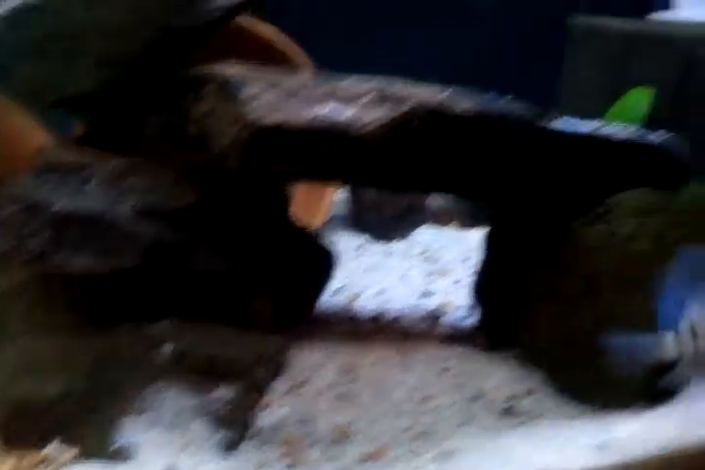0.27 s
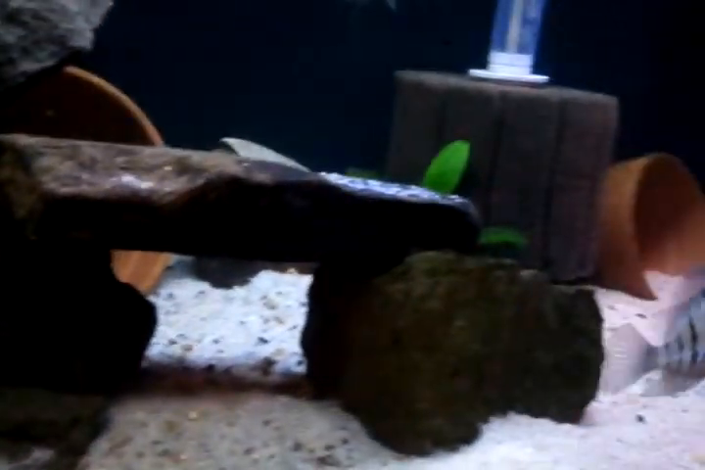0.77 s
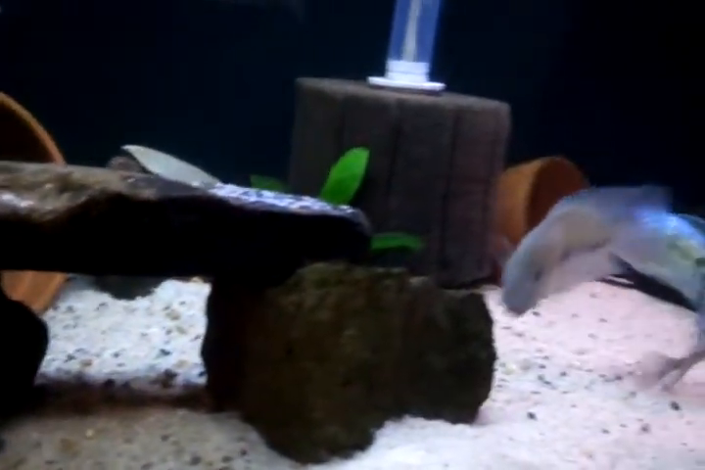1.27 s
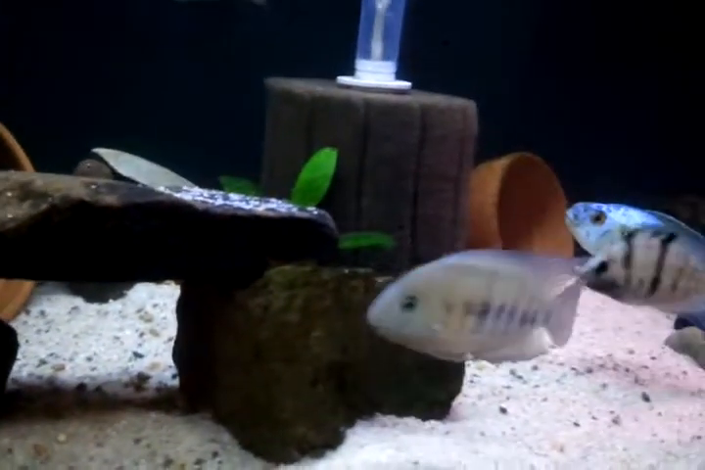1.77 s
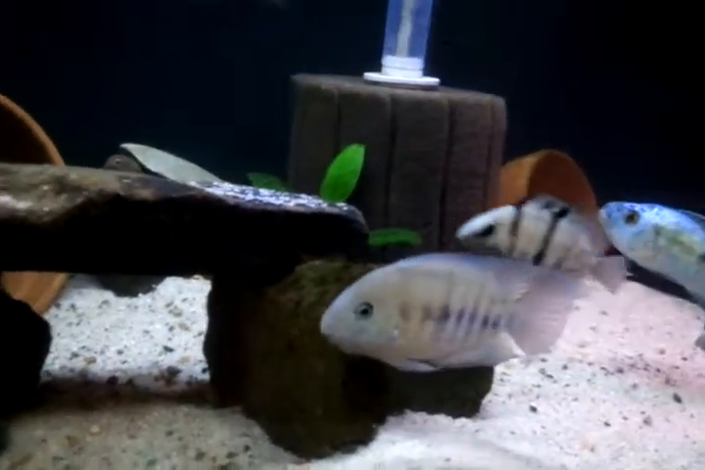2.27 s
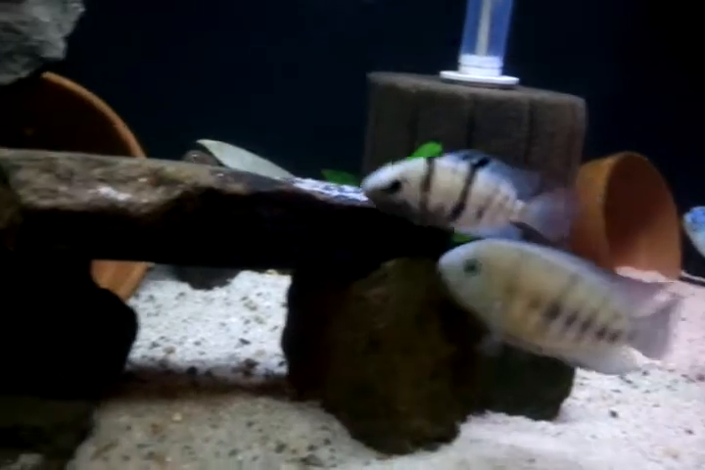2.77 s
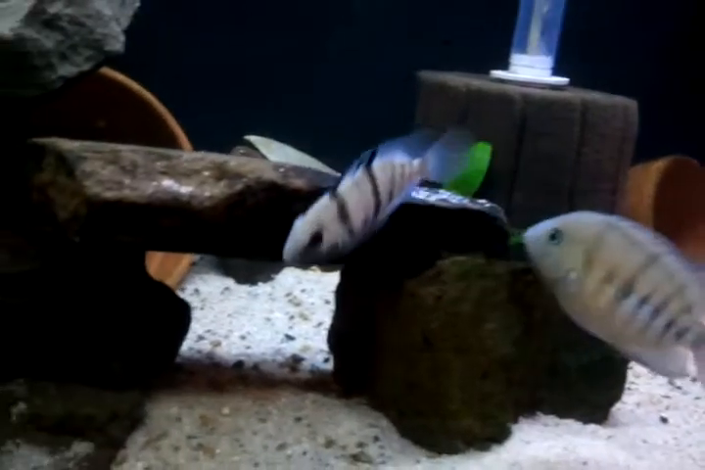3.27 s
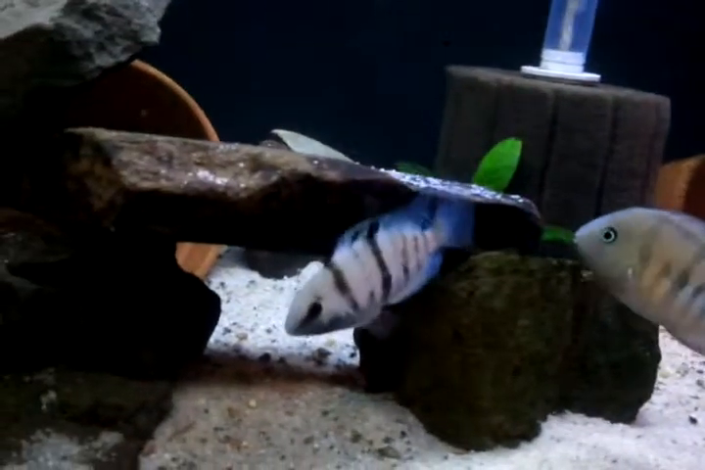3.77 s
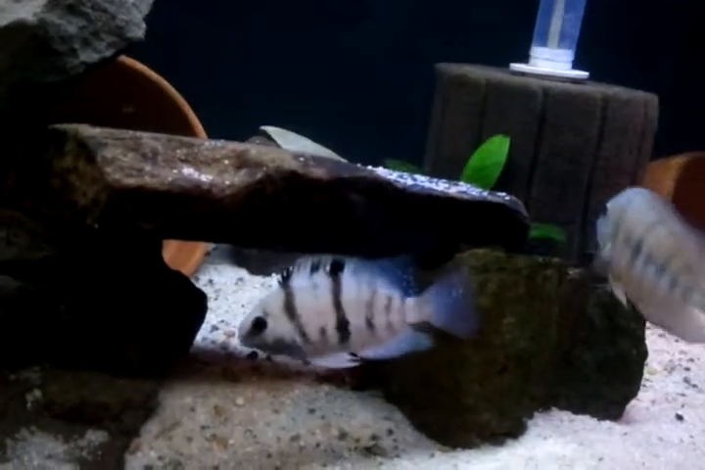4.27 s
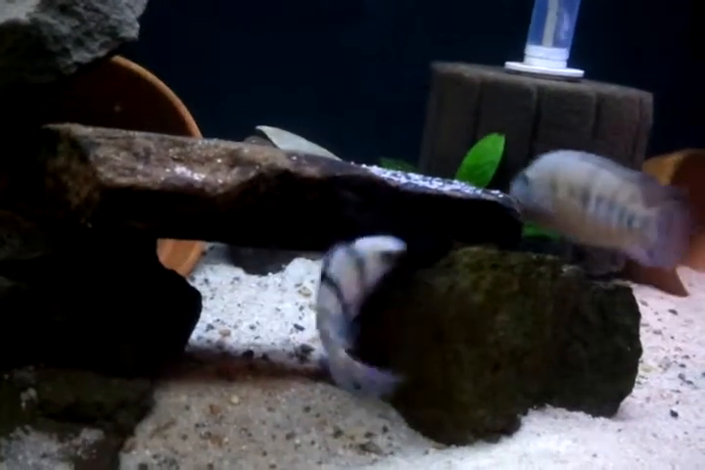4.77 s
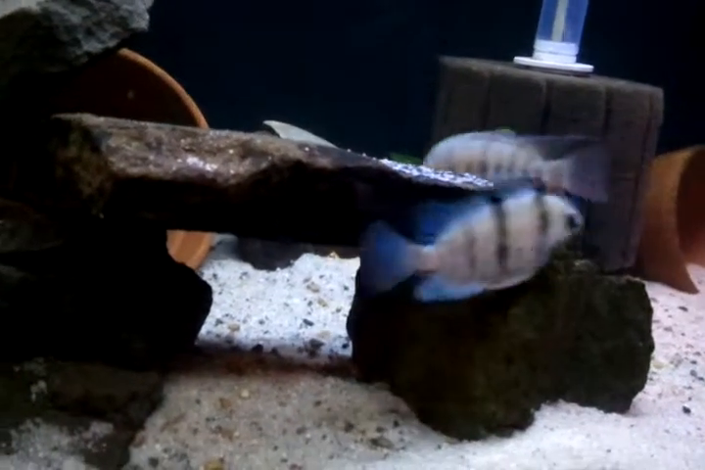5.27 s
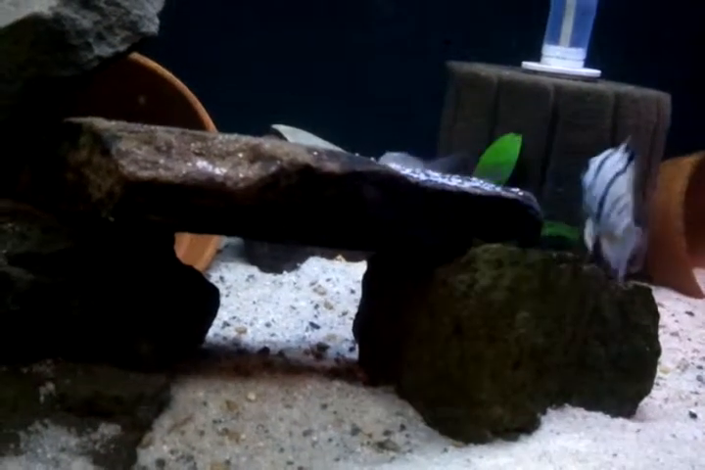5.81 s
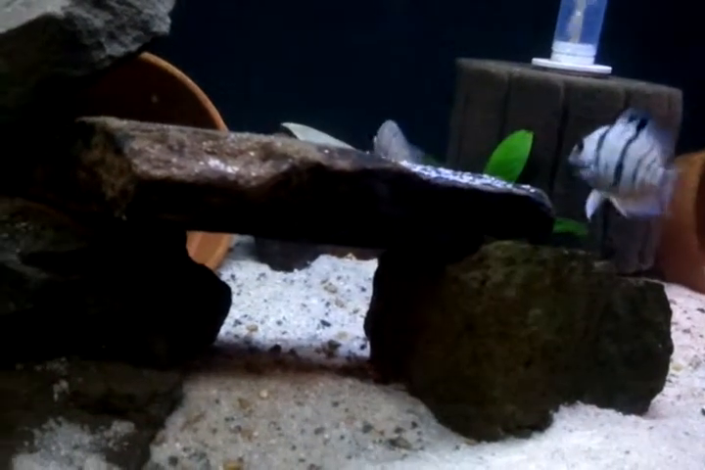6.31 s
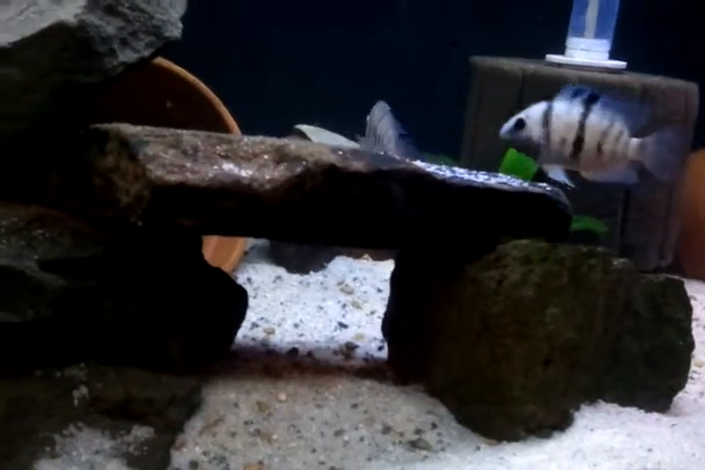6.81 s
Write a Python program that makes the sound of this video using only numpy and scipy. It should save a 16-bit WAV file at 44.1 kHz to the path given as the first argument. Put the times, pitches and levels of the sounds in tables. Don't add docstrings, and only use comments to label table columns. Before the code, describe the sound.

Close, single-microphone sound beside an indoor aquarium. Throughout, filter water falls into the tank with a soft mid-range wash and a brighter fizz of tiny bubbles, over low mains-like pump hum, motor noise and a thin steady whine near 1.4 kHz. From 0.3 seconds the moving camera brings grip knocks and fluttering air on the microphone: strong blows at about 0.5 and 0.65, a thud at 0.9, and the heaviest low buffet at 1.1, fading by 1.4. Small bumps follow at 1.9, 2.1 and 2.6, with low rising gulps between 1.9 and 2.6. Clear bubbles plip and ring between the glass walls, with denser small bursts around 3.3 to 4.4. Sharp droplets snap at 3.1, loudest at 3.6, and fainter at 5.5 and 6.8. The level eases slightly after 5 seconds, dipping near 6.2, while water and hum continue to the end at seven seconds.

```python
import sys
import numpy as np
from scipy import signal
from scipy.fft import rfft, irfft, next_fast_len
from scipy.io import wavfile
from scipy.ndimage import uniform_filter1d, map_coordinates

SR = 44100
rng = np.random.default_rng(int(sys.argv[2]) if len(sys.argv) > 2 else 0)


def store_wav(level_fs):
    pcm = np.round(np.clip(np.atleast_2d(level_fs), -1, 1) * 32767)
    wavfile.write(sys.argv[1], SR, pcm.T.astype(np.int16))


def natural_amplitude(level_db):
    exponent = np.asarray(level_db, float) / 20
    return 10 ** exponent


N = 310905

# frequency in Hz, density in dB per Hz.
RUMBLE_SPECTRUM = [(3, -30), (13, -5), (20, -7), (29, 0), (40, -7), (60, -8), (85, -10), (110, -16),
                   (160, -24), (350, -60)]
# start in seconds, rise in seconds, hold in seconds, level in dB.
SWAYS = [
    (.57, 0.38, 0.026, -30.5),
    (1.09, 0.055, 0.11, -21.5),
    (1.3, 0.075, 0.033, -34.5),
    (2.6, 0.26, 0.021, -35.5),
    (2.84, .15, 0.032, -43),
    (3.9, 0.14, 0.028, -37),
    (4.42, 0.25, 0.023, -38.5),
    (4.96, 0.15, 0.027, -38.5),
]

MAINS_HZ = 60.005
# mains order, rms level in dB.
HUM_LINES = [(1, -42), (2, -43), (3, -45), (4, -47), (6, -49), (8, -63), (9, -53.5), (10, -55), (11, -63),
             (14, -61), (17, -61)]
# mains order, rms level in dB, phase swing in radians,
# level swing once a cycle and twice a cycle as shares.
MAGNETIC_WHINE = (23, -40.6, .55, .06, .2)
# frequency in Hz, width in Hz, level in dB.
CASING_MODES = [(216.8, 42.6, -1.5), (285.6, 72.5, -2), (330.6, 52.4, 0.5), (569, 39, -2), (753, 110, -8),
                (1114, 190, -8), (1500, 200, -9.5)]

# start in seconds, level in dB, decay by 60 dB in seconds.
GRIP_KNOCKS = [
    (.33, -36, .1),
    (.47, -27, .16),
    (.655, -36, .3),
    (1.105, -25, .13),
    (1.906, -33, .11),
    (2.076, -35, .19),
    (2.57, -32, .055),
]
# frequency in Hz, density in dB per Hz.
SHELL_SPECTRUM = [(80, -18), (200, 1), (500, -0.5), (1200, 0), (2000, -29), (5000, -30.5), (8000, -58.5)]

RISE_DB = 23.5
FLUTTER_SAG_HZ_PER_S = 220
# start in seconds, rise in seconds, hold in seconds, level in dB,
# flutter in Hz.
GUSTS = [
    (.325, .02, .03, -26, 140),
    (.6, .02, .025, -21, 180),
    (.765, .01, .035, -25, 190),
    (.83, .03, .06, -33, 140),
    (1.18, .02, .045, -18, 135),
    (1.255, .01, .008, -26, 110),
    (.469, .004, .092, -13, 210),
    (.662, .04, .084, -12, 200),
    (1.106, .003, .05, -10.5, 132),
]
# start in seconds, rise in seconds, hold in seconds, level in dB.
RASPS = [
    (.325, .02, .015, -37),
    (.478, .01, .04, -21),
    (.57, .03, .02, -33),
    (.645, .03, .03, -32),
    (.79, .1, .17, -39),
    (1.107, .005, .04, -36),
]
# start in seconds, rise in seconds, hold in seconds, level in dB.
THUDS = [
    (.33, .04, .02, -28),
    (.48, .03, .03, -25),
    (.53, .03, .05, -24),
    (.6, .03, .04, -27),
    (.72, .08, .05, -32),
    (1.3, .05, .02, -30),
    (.93, .012, .05, -20),
    (1, .02, .03, -27),
    (1.085, .03, .11, -19),
    (1.72, .03, .06, -30.5),
]
# start in seconds, rise in seconds, hold in seconds, level in dB.
HOOTS = [
    (.345, .02, .03, -35),
    (.485, .015, .09, -23),
    (.665, .03, .01, -25),
    (.725, .03, .02, -23),
    (.87, .08, .2, -36),
    (1.125, .02, .02, -26),
    (1.19, .02, .03, -32),
]

# time in seconds, level in dB.
FLOW = [(0, -42), (.25, -41), (.5, -41.5), (.92, -40.5), (1.13, -44), (1.5, -40.5), (1.85, -40),
        (2.02, -41), (2.25, -40), (2.9, -41.5), (3.33, -40), (4.02, -41), (4.2, -39.5), (4.6, -41.5),
        (5.1, -40), (5.5, -41.5), (6.7, -41.5), (6.9, -39)]
# frequency in Hz, density in dB per Hz.
WASH_SPECTRUM = [(76, -32), (130, -4.5), (290, -4), (346, -7.5), (433, -8), (571, -7.5), (663, -8),
                 (1200, -14), (1410, -7.5), (1570, -11), (2600, -17.5), (3380, -52.5), (5720, -120)]
# frequency in Hz, density in dB per Hz.
FIZZ_SPECTRUM = [(1290, -16), (2200, -6.5), (2360, -5), (2800, -0.5), (3050, 1), (3690, 0), (4020, 0),
                 (6350, -7.5), (6670, -9.5), (7150, -19.5), (9300, -49), (15700, -120)]
# frequency in Hz, width in Hz, boost in dB.
LID_MODES = [(3170, 170, 2), (3700, 110, 4), (2150, 49, 3.5), (1736, 310, 4.5)]

# start in seconds, frequency in Hz, peak in dB.
DROPLETS = [
    (3.09, 6080, -19.5),
    (3.576, 4650, -15.5),
    (3.576, 6480, -34.5),
    (1.103, 3400, -26.5),
    (1.104, 1330, -22),
    (5.52, 6080, -26.5),
    (6.839, 5540, -28),
]

# start in seconds, pitch in Hz, peak in dB, pitch rise as a share, life in seconds.
GULPS = [
    (1.908, 195, -27, .95, .05),
    (2.084, 140, -22, 1.1, .05),
    (2.222, 200, -30, .9, .04),
    (2.56, 110, -28, .3, .08),
]
# start in seconds, pitch in Hz, peak in dB, echoing time in seconds.
LARGE_BUBBLES = [(.349, 1140, -35.5, 0.022), (1.414, 1290, -25.5, .03), (1.44, 1290, -25, .012),
                 (1.508, 1350, -30.5, 0.027), (1.548, 1460, -30, .012), (1.912, 1143, -33, 0.013),
                 (2.074, 835, -34, 0.0096), (2.204, 1117, -25.5, 0.027), (2.659, 1268, -25, .042),
                 (2.88, 790, -29, 0.025), (2.988, 1310, -28.5, 0.012), (3.4, 1310, -26.5, .003),
                 (3.613, 855, -34, 0.011), (3.752, 777, -35.5, 0.016), (4.179, 1038, -30.5, 0.014),
                 (5.182, 1120, -30, 0.016), (5.475, 1153, -26, .003), (5.615, 1070, -34, .013),
                 (5.792, 1065, -26.5, .019), (6.222, 1036, -31, 0.021), (6.642, 1154, -37, .018),
                 (6.771, 1166, -33.5, .02), (6.867, 1120, -35.5, .015)]
# start in seconds, pitch in Hz, peak in dB, echoing time in seconds.
MIDDLE_BUBBLES = [(0.326, 1540, -31, .013), (0.926, 1745, -30.5, 0.044), (1.303, 1460, -32.5, .025),
                  (1.394, 1705, -30.5, 0.03), (1.452, 1560, -29, .004), (1.581, 2125, -26, 0.0064),
                  (2.267, 1500, -33.5, .009), (2.328, 1950, -33, .007), (2.433, 2000, -35, .031),
                  (2.731, 2150, -23.5, .003), (2.937, 2150, -35, .014), (3.071, 2166, -26, 0.0066),
                  (3.281, 2150, -33, 0.018), (3.595, 1520, -33, 0.015), (3.888, 1750, -30.5, .013),
                  (3.893, 2150, -36, 0.0098), (4.117, 1680, -26.5, 0.0066), (4.153, 1670, -31, .008),
                  (5.222, 1776, -32.5, .011), (5.393, 1660, -34.5, 0.015), (5.651, 1580, -30, 0.016),
                  (5.966, 1695, -28.5, .024), (6.779, 1854, -32, 0.032), (6.939, 2460, -31.5, .008),
                  (.221, 1700, -38, 0.016), (.916, 2280, -38.5, 0.0099), (3.72, 1910, -37.5, 0.018),
                  (4.46, 2100, -34.5, .02), (6.352, 2170, -33, .01)]
# start in seconds, pitch in Hz, peak in dB, echoing time in seconds.
SMALL_BURSTS = [(.195, 3430, -28, 0.054), (.749, 5030, -35, .013), (.92, 3460, -28, 0.029),
                (1.738, 3370, -28.5, .008), (1.737, 3000, -32.5, 0.025), (1.905, 3840, -25, 0.0079),
                (2.154, 2960, -28.5, 0.02), (2.207, 4260, -27, .02), (3.086, 5850, -28.5, .011),
                (3.333, 3530, -29.5, 0.021), (3.379, 3100, -26, 0.0081), (3.577, 4400, -27, .009),
                (3.635, 3830, -29, .054), (3.871, 3550, -28, 0.011), (4.111, 2900, -25.5, .015),
                (4.153, 3120, -28, 0.02), (4.152, 5850, -32.5, .011), (4.196, 3580, -25.5, .045),
                (4.291, 3165, -30, 0.0077), (4.359, 2920, -31, 0.012), (4.712, 3084, -29.5, 0.036),
                (4.862, 3860, -28.5, 0.013), (5, 4830, -32, .018), (5.153, 3640, -26.5, 0.0077),
                (5.734, 4970, -33.5, 0.019), (6.572, 5060, -37, 0.036), (6.836, 4540, -29.5, 0.013),
                (6.936, 3660, -27, 0.0087), (6.955, 3060, -30, 0.0091), (6.996, 2884, -35, 0.013)]
# start in seconds, pitch in Hz, peak in dB, echoing time in seconds.
FINE_SPRAY = [(.806, 4580, -40, 0.016), (1.87, 5080, -34, 0.018), (1.941, 3860, -34, .01),
              (2.228, 4570, -38, .022), (3.575, 5480, -33.5, .01), (3.689, 5210, -34, .02),
              (3.819, 3320, -31.5, .019), (4.06, 2400, -38, .018), (4.13, 2946, -32, .03),
              (4.225, 3440, -31, 0.028), (6.84, 3700, -34, 0.018), (4.39, 3220, -32.5, .015),
              (4.711, 5220, -32, .007), (5.873, 5830, -35, 0.024), (6.661, 5450, -38, .029),
              (6.834, 5950, -35.5, .012), (6.867, 5460, -35.5, 0.0088)]
# start in seconds, pitch in Hz, peak in dB, echoing time in seconds.
SINGLE_PLIPS = [(.821, 733, -38, .005), (1.072, 713, -33.5, .005), (1.737, 1155, -33.5, .006),
                (4.621, 943, -36, .006), (5.599, 1100, -34, .005), (.203, 1870, -35.5, .006),
                (.741, 2150, -30, .005), (1.349, 1755, -35, .006), (1.521, 1680, -30, .008),
                (2.109, 1610, -33.5, .006), (2.937, 1610, -35.5, .005), (3.307, 1960, -32, .005),
                (3.578, 1560, -31, .005), (4.526, 1690, -33, .005), (4.872, 1670, -35, .006),
                (4.945, 1560, -32.5, .006), (5.84, 1690, -33.5, .008), (.097, 3200, -35, .006),
                (2.2, 2990, -29, .006), (2.33, 3130, -31, .006), (2.5, 3220, -30.5, .01),
                (2.616, 3340, -32.5, 0.0055), (2.656, 3300, -31.5, .02), (4.585, 3510, -31, .006),
                (5.322, 3230, -33, .006), (5.524, 3380, -31, .008), (6.055, 3320, -36, .006),
                (6.084, 3580, -35.5, .006), (6.54, 3280, -32.5, .006), (6.706, 3110, -33, .006),
                (6.12, 3050, -34, .02), (6.56, 3050, -33, .02), (6.33, 3000, -35, .01),
                (4.21, 3200, -30, .03)]

# time in seconds, gain in dB.
RECORDER_GAIN = [(0, -1.8), (.27, -1.8), (.4, -.9), (.87, 0), (4.85, 0), (5.4, -1.7), (5.8, -2),
                 (6.2, -3.2), (6.55, -2.1), (7.05, -1.8)]


def unit(x):
    return x / np.sqrt(np.mean(x ** 2) + 1e-20)


def along(points, hz):
    f, v = np.transpose(points)
    return np.interp(np.log(hz + 1), np.log(f + 1), v)


def curve(rows):
    s, value = np.transpose(rows)
    return np.interp(np.arange(N) / SR, s, value)


def wobble(rate):
    knots = rng.standard_normal(int(N * rate / SR) + 4)
    return map_coordinates(knots, [np.arange(N) * rate / SR])


def swell(rows, fall_db):
    return swells(rows, fall_db).max(axis=0)


def swells(rows, fall_db):
    t = np.arange(N) / SR
    shapes = []
    for s, rise, hold, db, *_ in rows:
        times = [s - 4 * rise, s, s + hold, s + hold + 1]
        shapes.append(np.interp(t, times, [db - 4 * RISE_DB, db, db, db - fall_db]))
    return np.array(shapes)


def filtered(x, response):
    m = next_fast_len(N + SR // 2)
    return irfft(rfft(x, m) * response(np.fft.rfftfreq(m, 1 / SR)), m)[..., :N]


def rush(response, patchy_db):
    z = signal.stft(rng.standard_normal(N), nperseg=512)[2]
    field = uniform_filter1d(rng.standard_normal(z.shape), size=5, axis=0)
    field = uniform_filter1d(field, size=7, axis=1)
    patchy = signal.istft(z * natural_amplitude(patchy_db * unit(field)), nperseg=512)[1][:N]
    return unit(filtered(patchy, response))


def steady(x, share):
    envelope = np.abs(signal.hilbert(x, next_fast_len(N))[:N])
    return unit(x / envelope ** share)


def plinks(s, hz, gain, t60, rise, size):
    t = np.arange(size) / SR
    s, hz, gain, t60, rise = (np.asarray(c)[:, None] for c in (s, hz, gain, t60, rise))
    phase = 2 * np.pi * hz * (t + rise * t * t / t60)
    wave = gain * np.sin(phase) * natural_amplitude(-60 * t / t60) * (1 - np.exp(-t * hz / 1.2))
    where = (s * SR).astype(int) + np.arange(size)
    return np.bincount(where.ravel(), wave.ravel(), N + SR)[:N]


def tank(x, t60):
    t = np.arange(SR // 5) / SR
    tail = rng.standard_normal(len(t)) * natural_amplitude(-60 * t / t60) * (t > .005)
    return signal.fftconvolve(x, tail / np.linalg.norm(tail))[:N]


def rumble():
    level = natural_amplitude(-35 + 1.2 * wobble(4.8)) + natural_amplitude(swell(SWAYS, fall_db=113.5))
    noise = rush(lambda f: natural_amplitude(along(RUMBLE_SPECTRUM, f)), patchy_db=1.0)
    return level * steady(noise, share=.36)


def pump():
    turn = 2 * np.pi * MAINS_HZ * np.arange(N) / SR
    lines = 0
    for k, db in HUM_LINES:
        phase = 2 * np.pi * rng.random() + .1 * wobble(3)
        lines = lines + natural_amplitude(db + .6 * wobble(4)) * np.sin(k * turn + phase)
    order, db, swing, once, twice = MAGNETIC_WHINE
    shake = 1 + once * np.cos(turn) + twice * np.cos(2 * turn)
    whine = natural_amplitude(db + .6 * wobble(4)) * shake * np.sin(order * turn + swing * np.sin(turn))

    def casing(f):
        return sum((-1) ** k * natural_amplitude(db) * 1j * f * w / (c * c - f * f + 1j * f * w)
                   for k, (c, w, db) in enumerate(CASING_MODES))

    motor = rush(lambda f: casing(f) ** 2, patchy_db=1.8)
    return np.sqrt(2) * (lines + whine) + natural_amplitude(-42.5) * motor


def knocks():
    t = np.arange(N) / SR
    shape = sum(natural_amplitude(db - 60 * np.maximum(t - s, 0) / t60) * (t > s) for s, db, t60 in GRIP_KNOCKS)
    shell = rush(lambda f: natural_amplitude(along(SHELL_SPECTRUM, f)), patchy_db=-3.0)
    return shape * unit(natural_amplitude(.81 * wobble(210)) * shell)


def buffet():
    gusts = swells(GUSTS, fall_db=650)
    s, _, hold, _, start_hz = np.transpose(GUSTS)[:, gusts.argmax(axis=0)]
    hz = start_hz - FLUTTER_SAG_HZ_PER_S * np.clip(np.arange(N) / SR - s, 0, hold)
    turn = 2 * np.pi * np.cumsum(hz * (1 + .12 * wobble(80))) / SR
    shedding = unit(np.sin(turn) * natural_amplitude(2.5 * wobble(90)))
    eddies = steady(wobble(200) * np.cos(.8 * turn) + wobble(200) * np.sin(.8 * turn), share=.6)
    flutter = steady(shedding + .95 * eddies, share=.55)

    thud = steady(rush(lambda f: 1 / (1 + ((f - 58) / 24) ** 4), patchy_db=.5), share=.7)
    hoot = steady(rush(lambda f: 1 / (1 + ((f - 295) / 40) ** 2), patchy_db=.1), share=.6)
    tearing = lambda f: 1 / (1 + ((f - 415) / 35) ** 2) + .07 * (f > 260) * (f < 1000)
    rasp = steady(rush(tearing, patchy_db=.1), share=.4)
    return (natural_amplitude(gusts.max(axis=0)) * flutter
            + natural_amplitude(swell(THUDS, fall_db=263.5)) * thud
            + natural_amplitude(swell(RASPS, fall_db=400.5)) * rasp
            + natural_amplitude(swell(HOOTS, fall_db=349.5)) * hoot)


def swarm(count, centre_hz, spread, cycles, scatter_db):
    draw, size = rng.random((count, 2)), rng.standard_normal(count)
    hz = np.clip(centre_hz * np.exp(spread * size), 700, 6200)
    gain = natural_amplitude(-scatter_db * np.log(draw[:, 1] + .1))
    near = plinks(draw[:, 0] * N / SR, hz, gain, cycles / hz, 0 * hz + .1, size=1000)
    return unit(near + natural_amplitude(4.0) * tank(near, t60=.11))


def stream():
    fizz_db = curve(FLOW)
    wash_db = -40.5 + .15 * (fizz_db - fizz_db.mean()) + .47 * wobble(6.3)
    surge_db = .6 * wobble(14)
    wash = rush(lambda f: natural_amplitude(along(WASH_SPECTRUM, f)), patchy_db=1.27)
    wash = wash + .5 * swarm(count=800, centre_hz=1416.4, spread=.421, cycles=61, scatter_db=2.0)
    fizz = rush(lambda f: natural_amplitude(along(FIZZ_SPECTRUM, f)), patchy_db=1.0)
    fizz = fizz + .7 * swarm(count=3000, centre_hz=3600, spread=.28, cycles=70, scatter_db=4.5)
    water = natural_amplitude(wash_db + surge_db) * unit(wash)
    water = water + natural_amplitude(fizz_db + surge_db + 1.02 * wobble(30)) * unit(fizz)

    def lid(f):
        return natural_amplitude(sum(db / (1 + (2 * (f - hz) / width) ** 2) for hz, width, db in LID_MODES))

    return filtered(water, lid)


def ticks():
    s, hz, db = np.transpose(DROPLETS)
    near = plinks(s, hz, natural_amplitude(db + 2.5), 16 / hz, 0 * hz, size=600)
    return near + natural_amplitude(-6.5) * tank(near, t60=.05)


def gulps():
    s, hz, db, rise, life = np.transpose(GULPS)
    return plinks(s, hz, natural_amplitude(db + 10), 1.9 * life, rise, size=6000)


def bubbles():
    rows = np.vstack([LARGE_BUBBLES, MIDDLE_BUBBLES, SMALL_BURSTS, FINE_SPRAY, SINGLE_PLIPS])
    s, hz, db, length = (c[:, None] for c in rows.T)
    draw = rng.standard_normal((len(s), 3, 10))
    echo = np.arange(10)
    repeat = echo > 0
    small = np.clip((hz - 1800) / 1500, 0, 1)
    spacing = .0095 - .005 * small
    delay = (echo + (.08 + .25 * small) * draw[:, 0] * repeat) * spacing
    pitch = hz * (.985 + (.007 + .032 * small) * draw[:, 1])
    past = np.maximum(delay - length, 0)
    gain = natural_amplitude(db + 4 - 3.8 * small - 110 * delay - 1400 * past + 2 * draw[:, 2] * repeat)
    t60 = (48 + 15 * small) / pitch
    start = s + np.abs(delay)
    near = plinks(start.ravel(), pitch.ravel(), gain.ravel(), t60.ravel(), 0 * gain.ravel() + .07, size=1800)
    return near + natural_amplitude(-8.5) * tank(near, t60=.16)


def scene():
    background = rumble() + pump()
    handling = knocks() + buffet()
    water = stream() + ticks() + gulps() + bubbles()
    return (background + handling + water)[None]


def low_pass(x):
    return signal.sosfilt(signal.butter(12, 7300, fs=SR, output="sos"), x)


def record(dry):
    top_hz, negative_limit, offset = 7260, .33, -.345
    x = np.where(dry < 0, negative_limit * np.tanh(dry / negative_limit), dry)
    x = filtered(x, lambda f: 1 / (1 + (f / top_hz) ** 70))
    mix = natural_amplitude(curve(RECORDER_GAIN)) * (x + offset)
    return low_pass(mix)


dry = scene()
out = record(dry)
store_wav(out)
```